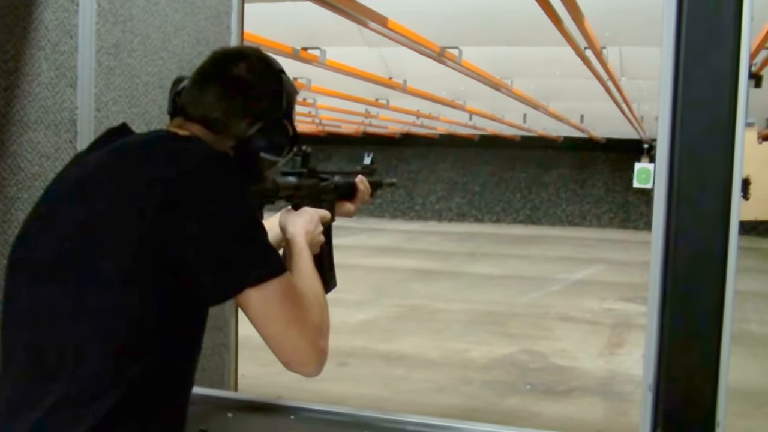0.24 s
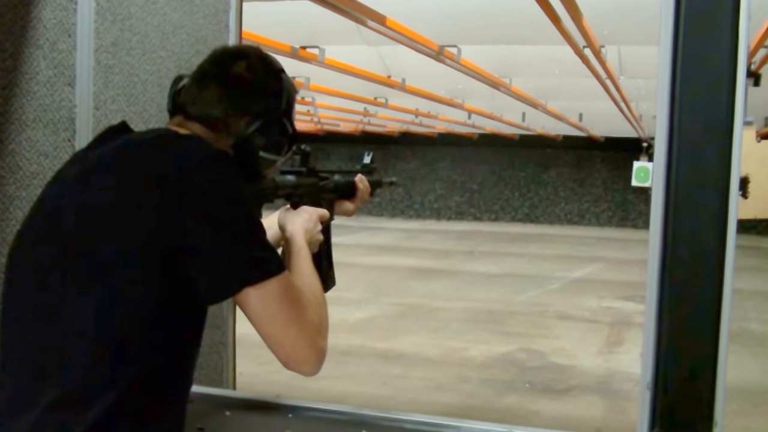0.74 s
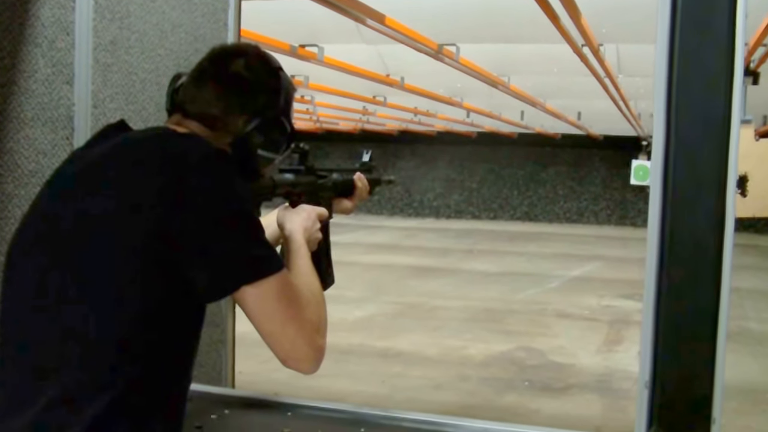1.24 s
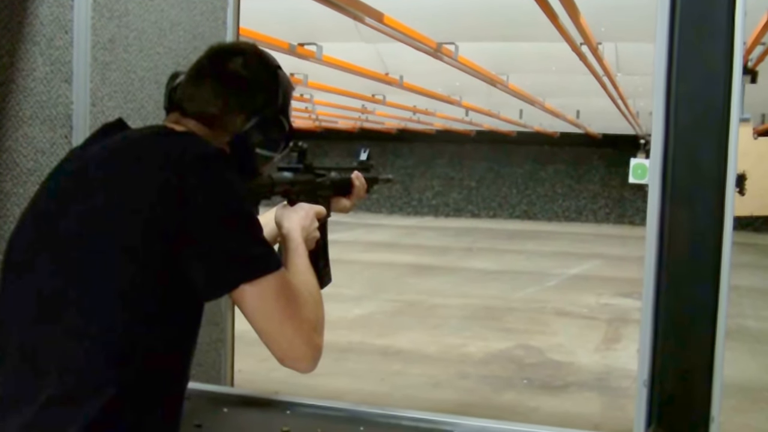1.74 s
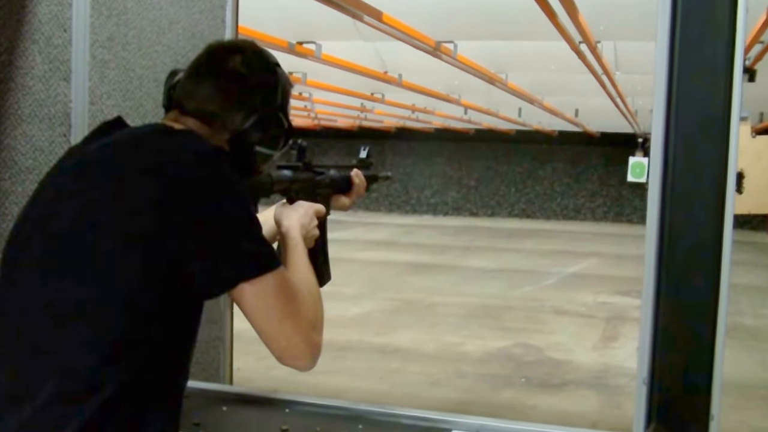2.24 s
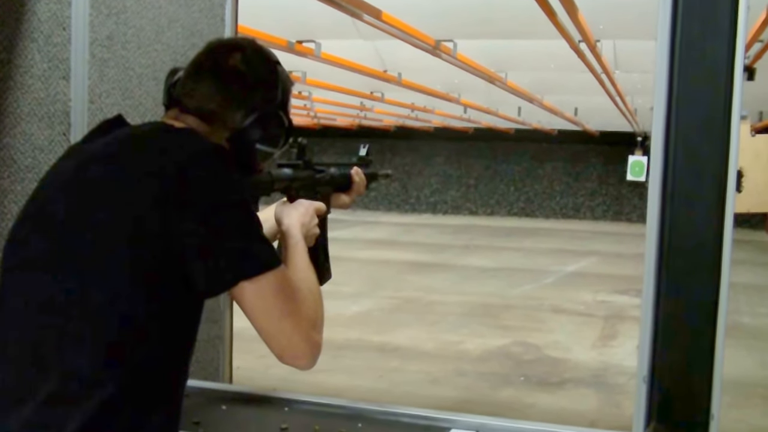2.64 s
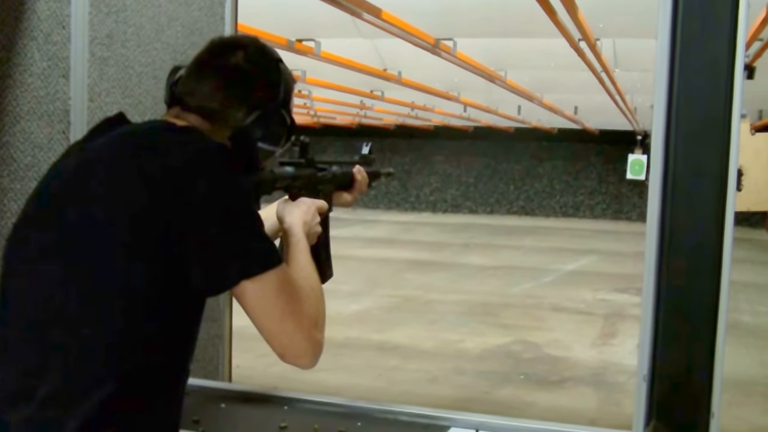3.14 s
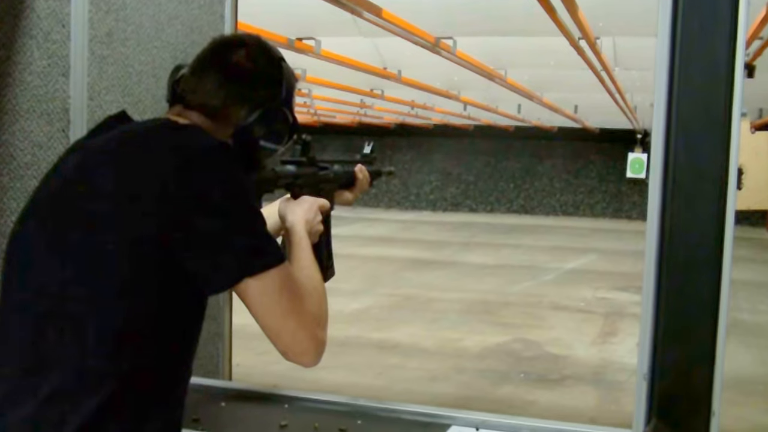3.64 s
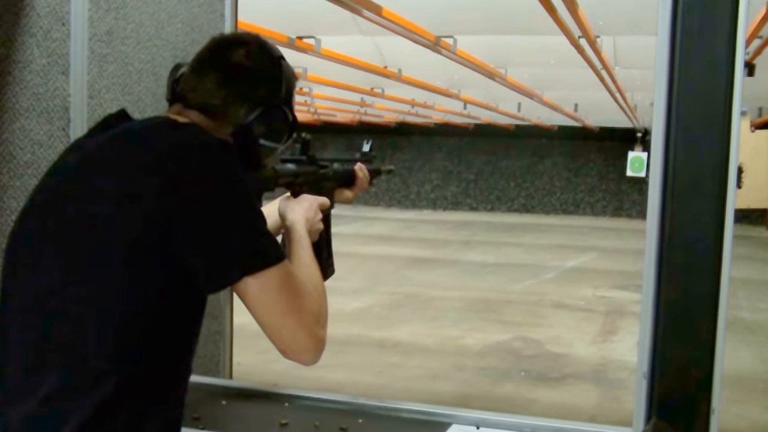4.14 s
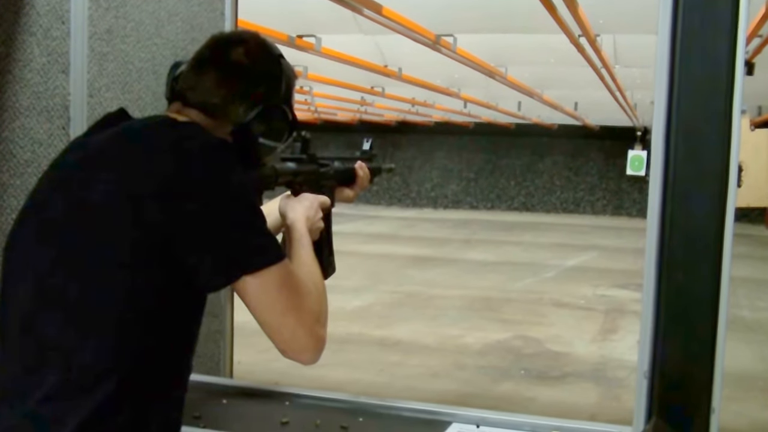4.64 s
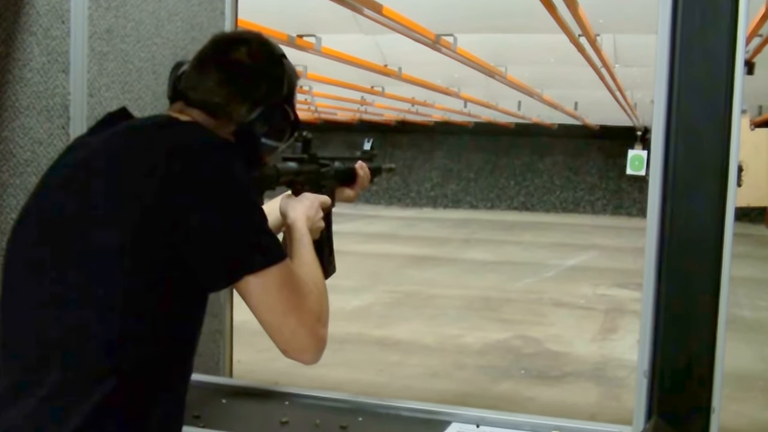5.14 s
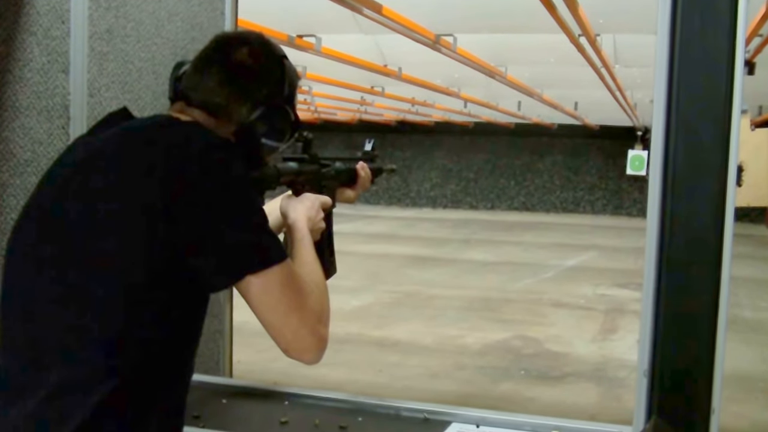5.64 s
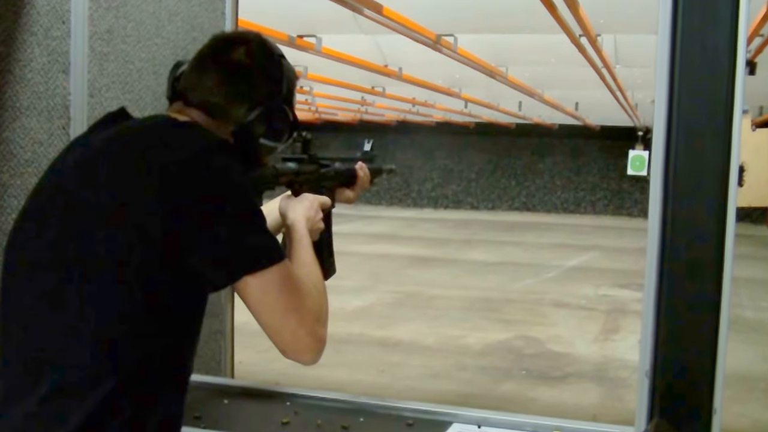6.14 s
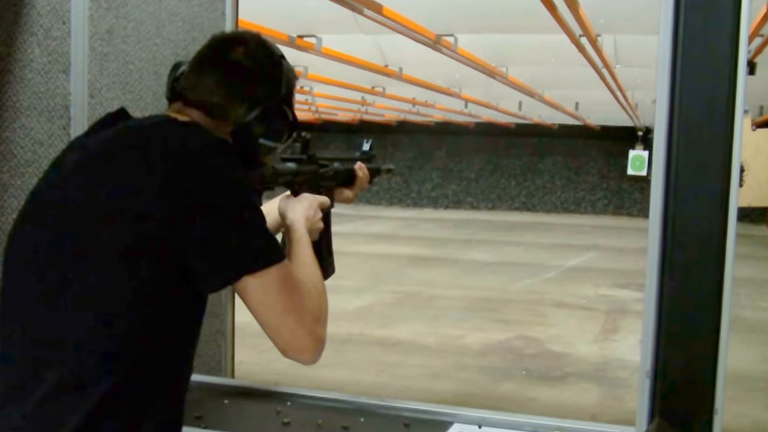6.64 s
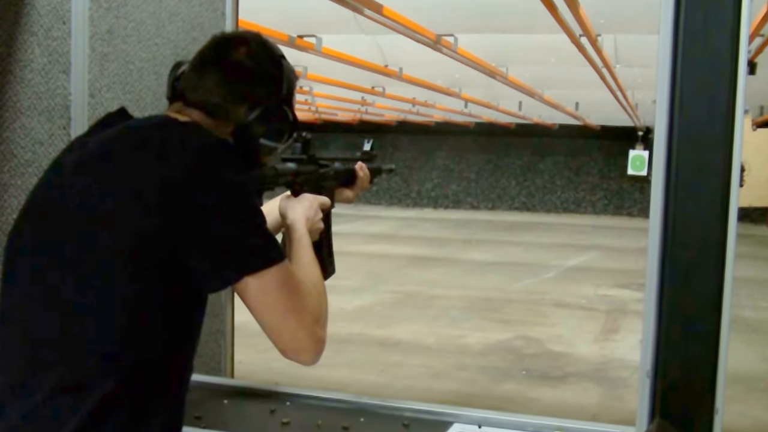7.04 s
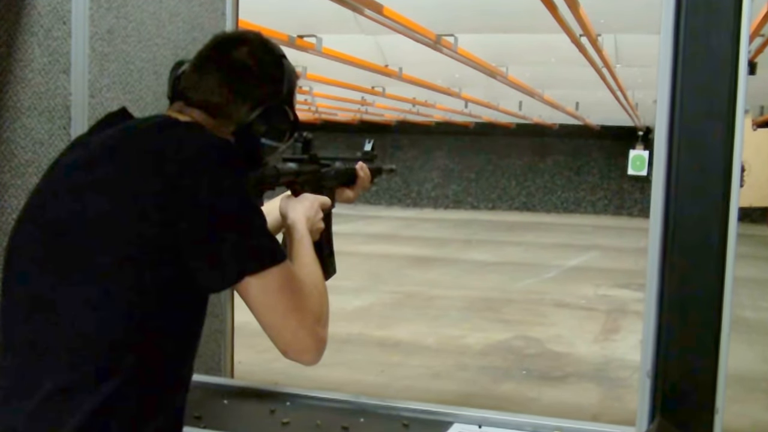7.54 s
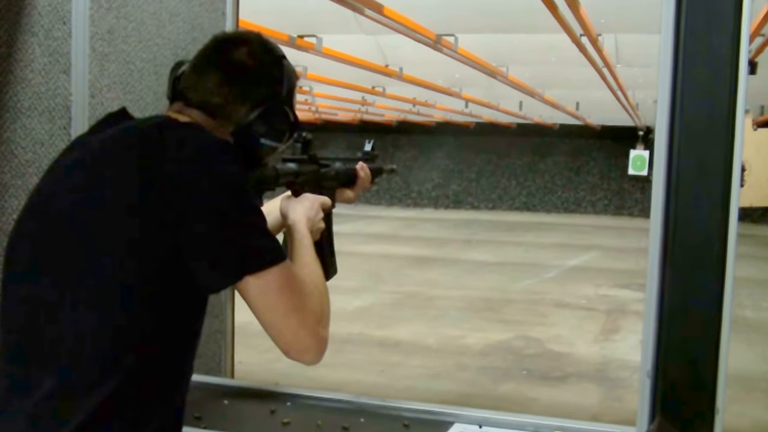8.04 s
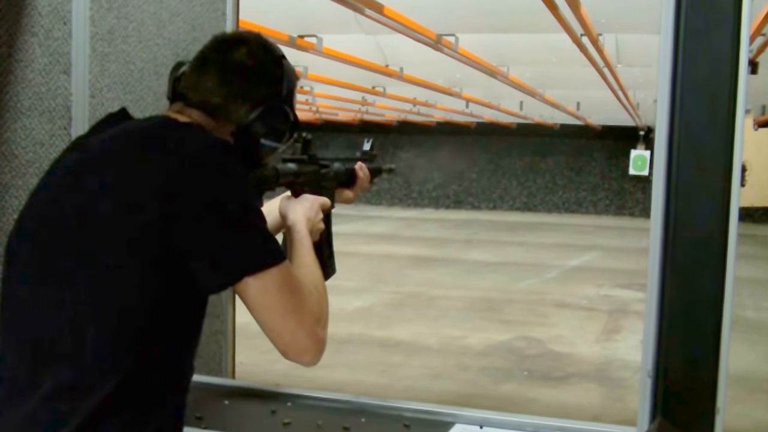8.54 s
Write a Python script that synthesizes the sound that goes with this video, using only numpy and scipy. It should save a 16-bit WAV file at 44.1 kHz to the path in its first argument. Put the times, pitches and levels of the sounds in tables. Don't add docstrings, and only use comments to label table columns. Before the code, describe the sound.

Steady single small-rifle shots crack in an indoor range, each with a quick slap from the backstop and a long, hollow echo.

```python
import sys
import numpy as np
from scipy import signal
from scipy.fft import rfft, irfft, next_fast_len
from scipy.io import wavfile
from scipy.ndimage import uniform_filter1d

SR = 44100
rng = np.random.default_rng(int(sys.argv[2]) if len(sys.argv) > 2 else 0)


def wav_record(signal):
    frames = np.transpose(np.atleast_2d(signal))
    bounded = np.clip(frames, -1, 1)
    quanta = np.round(bounded * 32767).astype(np.int16)
    wavfile.write(sys.argv[1], SR, quanta)


def magnitude_from_level(level_db):
    exponent = np.asarray(level_db, float) / 20
    return 10 ** exponent


N = 387198
HOP, FRAMES = 256, 220
T = np.arange(FRAMES * HOP) / SR
SHORT = 4000


def along(points, hz):
    f, v = np.transpose(points)
    return np.interp(np.log(hz + 1), np.log(f + 1), v)


def filtered(x, response):
    size = next_fast_len(x.shape[-1] + 8192)
    gain = response(np.fft.rfftfreq(size, 1 / SR))
    return irfft(rfft(x, size) * gain, size)[..., :x.shape[-1]]


def add(out, x, s):
    i = round(s * SR)
    x = x[..., max(-i, 0):max(N - i, 0)]
    out[..., max(i, 0):][..., :x.shape[-1]] += x


# pitch_hz, side_minus_mid_db
WIDTH = [(60, -10), (130, -15), (250, -23.5), (500, -27.5), (1100, -26), (2000, -21), (4000, -16),
         (8000, -14)]


def mid_side_gain(hz):
    return np.array([hz ** 0, magnitude_from_level(along(WIDTH, hz))])


def noise(spectrum, size):
    white = rng.standard_normal((2, size))
    pair = filtered(white, lambda hz: magnitude_from_level(along(spectrum, hz)) * mid_side_gain(hz))
    return pair / np.std(pair[0])


def reflections():
    return rng.standard_normal((2, HOP + 1, FRAMES + 1, 2)) @ [1, 1j]


def dying(draw, spectrum, t60, tilt_db=0, build_up=((1, .001),)):
    hz = np.fft.rfftfreq(2 * HOP, 1 / SR)
    t = np.arange(FRAMES + 1) * HOP / SR
    colour = magnitude_from_level(along(spectrum, hz) + tilt_db * np.log2((hz + 100) / 1000))
    fade = magnitude_from_level(-60 * t / along(t60, hz)[:, None])
    fill = 1 - np.exp(-(t + .003) / along(build_up, hz)[:, None])
    shape = colour[:, None] * fade * fill / np.linalg.norm(colour) * .8
    return signal.istft(draw * shape * mid_side_gain(hz)[..., None], nperseg=2 * HOP)[1]


def rings(rows, scatter_db, rough, rise):
    delay, hz, db, t60 = np.transpose(rows)[..., None]
    t = np.maximum(T[:SHORT] - .003 - delay, 0)
    drift = rough * np.cumsum(rng.standard_normal(t.shape) * (t > 0), axis=1) * np.sqrt(hz / SR)
    level_db = db + scatter_db * rng.standard_normal(hz.shape) - 60 * t / t60
    level = magnitude_from_level(level_db) * (1 - np.exp(-t / rise))
    return np.sum(level * np.sin(2 * np.pi * hz * t + drift), axis=0)


# start_s, crack_db, booth_db, backstop_slap_db, hall_over_booth_db
SHOTS = [(.0125, -6, -18, -6.3, -6), (.6473, -3.3, -17, -3.5, -9.5), (1.3345, -.5, -16, -6.6, -6.5),
         (2.319, -1.5, -15, -1, -10), (2.929, 6, -16.5, -12, -6.5), (3.711, -1, -19.5, -3, -6.5),
         (4.6764, .5, -17.5, -1.5, -6.5), (5.3807, 3.2, -16, -13, -6.5), (6.9042, .8, -16, -6.8, -5.5),
         (7.488, -.5, -15.5, -10, -9.5), (8.0998, -1.5, -18, -15, -8), (8.702, -4, -15.3, -10, -8)]
# start_s, crack_db, booth_db, backstop_slap_db, hall_over_booth_db
SNAPPY_SHOT = (6.0945, 1.5, -18, -22, -21)
# delay_s, pitch_hz, level_db, t60_s
CRACK = [(-.0018, 2900, -11, .004), (.0006, 4300, -5, .009), (.0012, 4700, -4, .009),
         (.0006, 9100, -9, .009), (.0009, 1500, -11, .01), (.0025, 240, -16, .03), (.003, 135, -27, .09),
         (.008, 9000, -17, .008), (.001, 6500, -9, .009), (.0009, 3400, -7, .008), (.008, 4500, -14, .008),
         (.0035, 5000, -15, .015)]
# delay_s, pitch_hz, level_db, t60_s
SNAP = [(0, 2700, 3, .004), (.0013, 3000, -3, .004), (0, 1400, -4, .012), (.0028, 9200, -11, .01),
        (.002, 6200, -11, .012), (.0025, 4500, -9, .006), (.0003, 3700, -4, .008), (.001, 700, -12, .015)]


def rifle():
    out = np.zeros((2, N))
    walls, same = rooms(), .85
    steel_hit_s, rubber_hit_s = .1285, .126
    for row in SHOTS:
        hit_s = steel_hit_s if row[3] > -6.5 else rubber_hit_s
        shot(out, row, CRACK, same * walls + np.sqrt(1 - same ** 2) * rooms(), hit_s)
    shot(out, SNAPPY_SHOT, SNAP, rooms(), .1335, duck_db=-7)
    return filtered(out, lambda hz: magnitude_from_level(along([(30, -45), (80, -20), (125, 0)], hz)))


# delay_s, pitch_hz, level_db, t60_s
SLAP = [(0, 1700, -1, .011), (0, 2300, -1, .008), (.0095, 1900, -5, .004), (0, 9200, -24, .01),
        (0, 4600, -19, .008), (0, 6500, -23, .008)]
# pitch_hz, level_db
BOOTH = [(60, -45), (110, -22), (260, -7.5), (520, -7), (750, -2.5), (1050, -3.5), (1400, -3), (2200, -3),
         (3200, -7), (5460, -13), (7500, -19), (10600, -17), (22000, -120)]
# pitch_hz, t60_s
BOOTH_T60 = [(150, 1.1), (400, 1.3), (900, 1.2), (1500, .85), (2500, .7), (5000, .45), (9000, .36)]
# pitch_hz, build_up_s
BUILD_UP = [(300, .01), (1000, .025), (1500, .012), (2500, .001)]
# pitch_hz, level_db
HALL = [(60, -40), (250, -14), (750, -4), (1500, -4), (4000, -7.5), (5200, -14), (7200, -18), (10600, -21),
        (22000, -120)]
# pitch_hz, t60_s
HALL_T60 = [(150, 1.4), (400, 1.7), (800, 1.5), (1500, 1.0), (2500, .84), (4200, .74), (5200, .63),
            (7300, .52), (9000, .36)]


def shot(out, row, crack, room, delay, duck_db=0):
    s, crack_db, booth_db, slap_db, hall_db = row
    muzzle = rings(crack, scatter_db=1.8, rough=.6, rise=.00012)
    add(out[0], magnitude_from_level(crack_db) * muzzle, s - .003)
    slap = rings(SLAP, scatter_db=1.1, rough=.3, rise=.0002)
    add(out[0], magnitude_from_level(slap_db + 1.5) * slap, s + delay - .003)
    add(out[0], magnitude_from_level(booth_db + 1.5 + duck_db / 2) * swells(), s)
    booth = dying(room[0], BOOTH, BOOTH_T60, build_up=BUILD_UP)
    add(out, magnitude_from_level(booth_db + duck_db * (1 - np.exp(-T / .07))) * booth, s + crack[0][0])
    hall = dying(room[1], HALL, HALL_T60)
    add(out, magnitude_from_level(booth_db + hall_db) * (1 - np.exp(-T / .003)) * hall, s + delay)


def rooms():
    return np.array([reflections(), reflections()])


# delay_s, pitch_hz, level_db, width_s
SWELLS = [(.034, 230, -13, .012), (.026, 140, -23, .016), (.048, 1350, -5, .012), (.073, 540, -8, .011),
          (.056, 950, -7, .012), (.036, 720, -9, .014), (.04, 1750, -10, .02), (.033, 5300, -16, .004)]


def swells():
    delay, hz, db, width = np.transpose(SWELLS)[..., None]
    t = T[:2 * SHORT]
    drift = .45 * np.cumsum(rng.standard_normal((len(hz), len(t))), axis=1) * np.sqrt(hz / SR)
    level = magnitude_from_level(db + 1.5 * rng.standard_normal(hz.shape)) * np.exp(-((t - delay) / width) ** 2)
    return np.sum(level * np.sin(2 * np.pi * hz * t + drift), axis=0)


# start_s, boom_db, rise_s, tilt_db_per_octave
BOOMS = [
    (-.012, -9, .004, -.4),
    (3.483, -7.2, .007, -.3),
    (7.565, -8, .01, -1.6),
]
# pitch_hz, level_db
HEAVY = [(35, -60), (60, -38), (185, -13), (330, -6), (490, -4), (806, -5), (1250, -4), (1700, -9),
         (3000, -21), (6000, -28), (10600, -31), (22000, -120)]
# pitch_hz, t60_s
BOOM_T60 = [(150, 1.2), (400, 1.4), (1000, 1.2), (2500, .75), (5000, .6), (9000, .35)]


def booms():
    out = np.zeros((2, N))
    for s, db, rise, tilt_db in BOOMS:
        swell = (1 - np.exp(-T / rise)) * (1 + 1.2 * magnitude_from_level(-60 * T / .4))
        add(out, magnitude_from_level(db - 6) * swell * dying(reflections(), HEAVY, BOOM_T60, tilt_db), s)
    return out


# start_s, peak_db, pitch_hz
TICKS = [(0.2824, -36, 5410), (1.1029, -46, 4150), (1.2366, -50, 4190), (2.143, -49, 5530),
         (2.6364, -34, 4380), (2.8075, -45, 4200), (4.1649, -44, 7100), (4.3074, -59, 5550),
         (4.4558, -42, 7150), (4.5864, -50, 4160), (4.5945, -45, 4290), (5.247, -46, 5660),
         (5.7794, -46, 4000), (5.8745, -44, 4310), (5.9694, -53, 4090), (6.0018, -50, 7000),
         (6.018, -53, 6500), (6.034, -51, 7200), (6.6428, -44, 6050), (6.7694, -54, 6290),
         (7.3188, -32, 7040), (8.6058, -47, 5950)]
# pitch_hz, level_db
CLOTH = [(800, -30), (2500, -4), (6000, 0), (10500, -5), (22000, -120)]


def ticks():
    out, t = np.zeros((2, N)), T[:SHORT]
    for s, db, hz in TICKS:
        snap_and_tail = .35 * magnitude_from_level(-60 * t / .02) + .11 * magnitude_from_level(-60 * t / .2)
        tick = snap_and_tail * noise(CLOTH, SHORT)
        tick[0] += .5 * magnitude_from_level(-60 * t / .015) * np.sin(2 * np.pi * hz * t)
        add(out, magnitude_from_level(db - 2.5) * tick, s)
    return out


# start_s, length_s, first_hz, settled_hz, peak_db
SQUEAKS = [
    (4.41, .195, 4850, 4110, -60),
    (6.552, .085, 5350, 5300, -76),
]
# start_s, length_s, level_db
RUSTLE = [(4.15, .1, -71), (4.41, .24, -70), (6.76, .07, -63), (5.96, .1, -69), (6.6, .1, -71)]


def handling():
    out, t = np.zeros((2, N)), np.arange(N) / SR
    waver = uniform_filter1d(rng.standard_normal(N), size=150)
    for s, length, first_hz, settled_hz, db in SQUEAKS:
        sag = np.exp(-np.clip(t - s, 0, length) / .045)
        hz = settled_hz + (first_hz - settled_hz) * sag
        phase = 2 * np.pi * np.cumsum(hz + 700 * waver) / SR
        swell_db = 7 * (np.exp(-(((t - s) / length - .45) / .16) ** 2) - 1)
        edges = np.clip(np.minimum(t - s, s + length - t) / .012, 0, 1)
        out[0] += magnitude_from_level(db + swell_db) * edges * (np.sin(phase) + .3 * np.sin(2 * phase))
    rub = np.zeros(N)
    for s, length, db in RUSTLE:
        rub += magnitude_from_level(db) * np.clip(np.minimum((t - s) / .01, (s + length - t) / .04), 0, 1)
    return out + rub * noise(CLOTH, N)


# pitch_hz, level_db
AIR = [(15, -55), (30, -36), (42, -30), (60, -16), (100, -21), (120, -4), (138, 3), (152, -6), (168, -24),
       (230, -26), (900, -32), (3000, -47), (7000, -62), (8500, -85), (22000, -120)]


def air():
    starts = np.array([row[0] for row in SHOTS + BOOMS + [SNAPPY_SHOT]])
    since = np.arange(N) / SR - starts[:, None]
    duck_db = -9 * np.max((since > 0) * np.exp(-np.abs(since) / .5), axis=0)
    return magnitude_from_level(-45 + 1 + duck_db) * noise(AIR, N)


# pitch_hz, level_db
SPRAY = [(120, -30), (200, 0), (1070, -7), (1600, -3), (5830, -4), (10100, -2), (10600, -3), (13800, -33),
         (22000, -120)]


def lead_in_spray():
    out = np.zeros((2, N))
    grid_s, grid_start_s, least_lead_s = .032, .008, .018
    attacks = [(row[0], row[2] - 10) for row in SHOTS + [SNAPPY_SHOT]]
    attacks.append((BOOMS[1][0], -33))
    for s, db in attacks:
        lead = least_lead_s + (s - least_lead_s - grid_start_s) % grid_s
        rise = T[:SHORT] / (lead + .01)
        level = magnitude_from_level(db - 150 * lead)
        add(out, level * (rise < 1) * rise ** .95 * noise(SPRAY, SHORT), s - lead - .01)
    return out


def scene():
    mid, side = rifle() + booms() + ticks() + handling() + air() + lead_in_spray()
    return np.array([mid + side, mid - side])


# pitch_hz, level_db_per_bin
MID_KEPT = [(6500, -120), (7500, -96), (10500, -90)]
# pitch_hz, level_db_per_bin
SIDE_KEPT = [(100, -64), (300, -69), (1500, -70), (4000, -74), (6000, -84), (8000, -89)]


def starved(pair):
    hz, t, z = signal.stft(pair, SR, nperseg=1411)
    band = np.sqrt(hz / 8).astype(int)
    frame = np.arange(len(t)) // 2
    band_starts, frame_starts = np.unique(band, True)[1], np.unique(frame, True)[1]
    power = np.add.reduceat(abs(z) ** 2, band_starts, 1)
    power = np.add.reduceat(power, frame_starts, 2) / 2
    masking = np.array([[[.85]], [[.55]]])
    loud_db = 10 * np.log10(power[0].sum(0) + 1e-20) + 35
    level_db = 10 * np.log10(power / np.bincount(band)[:, None] + 1e-20) - masking * loud_db
    level_db += np.array([[[4]], [[6]]]) * rng.standard_normal(power.shape)
    limit_db = np.array([along(MID_KEPT, hz), along(SIDE_KEPT, hz)])[..., None]
    kept = level_db[:, band][..., frame] > limit_db
    return signal.istft(z * kept, SR, nperseg=1411)[1][:, :N]


def top_cut(x):
    return signal.sosfilt(signal.butter(12, 11550, fs=SR, output="sos"), x)


# pitch_hz, level_db
TREBLE_NOTCH = [(7550, 0), (7800, -18), (7980, -18), (8150, 1.5), (10600, 1.5), (10800, -30), (12000, -45),
                (16000, -50)]


def record(dry):
    left, right = filtered(dry, lambda hz: magnitude_from_level(along(TREBLE_NOTCH, hz)))
    mid, side = starved([(left + right) / 2, magnitude_from_level(3) * (left - right) / 2])
    mix = np.clip([mid + side, mid - side], -1, 1)
    return top_cut(mix)


dry = scene()
out = record(dry)
wav_record(out)
```